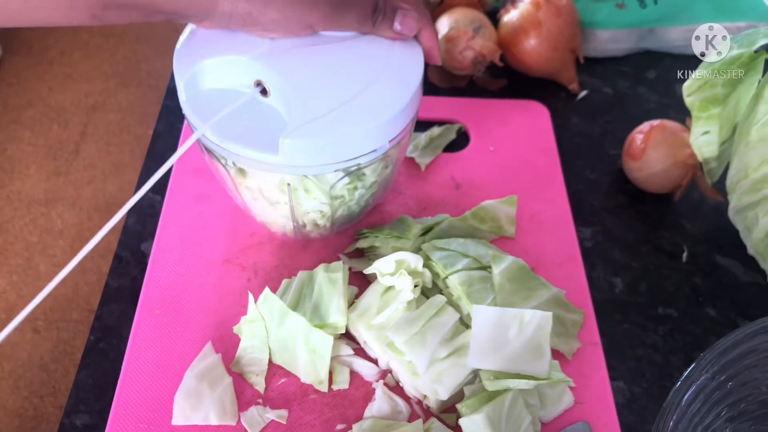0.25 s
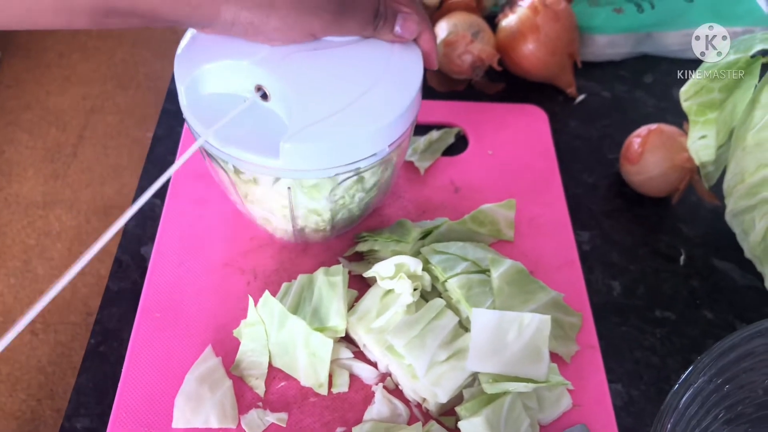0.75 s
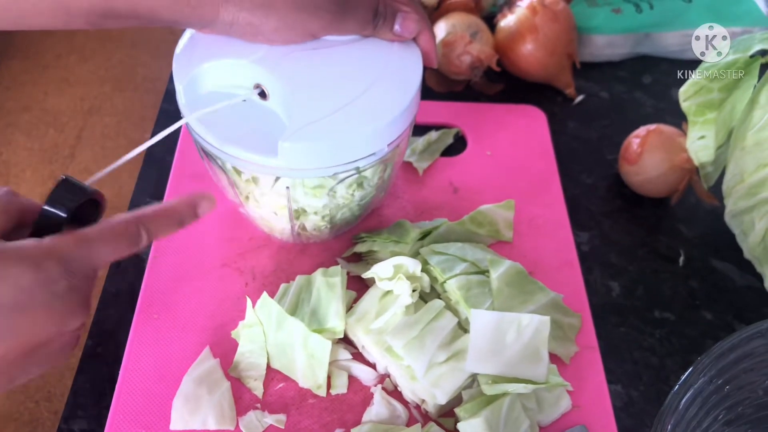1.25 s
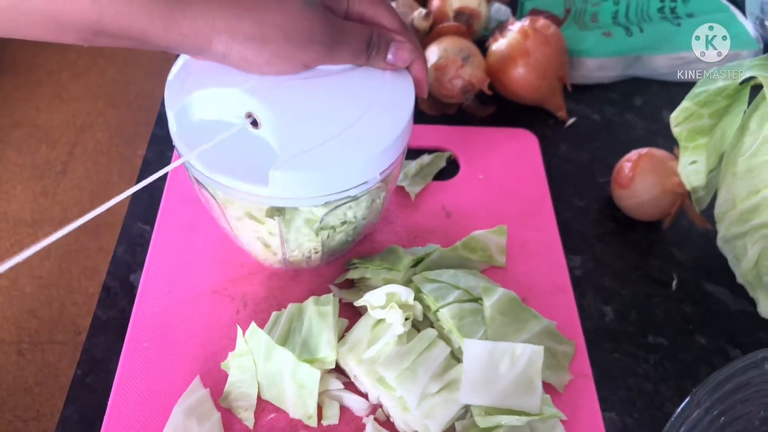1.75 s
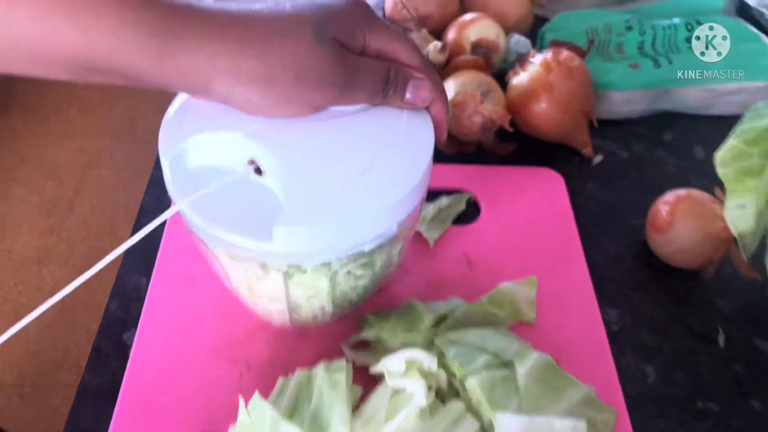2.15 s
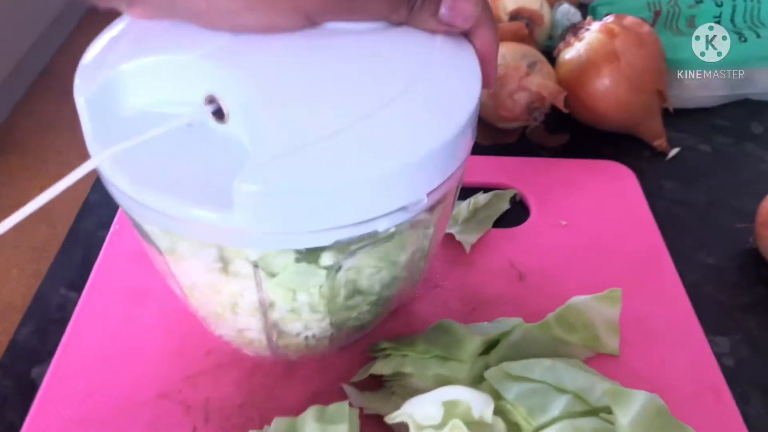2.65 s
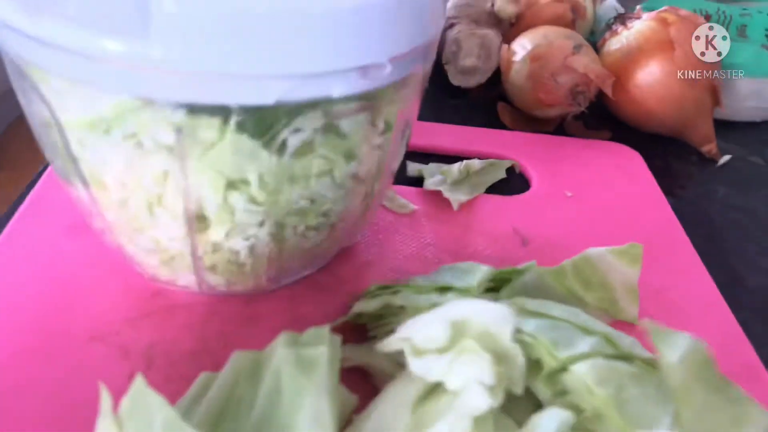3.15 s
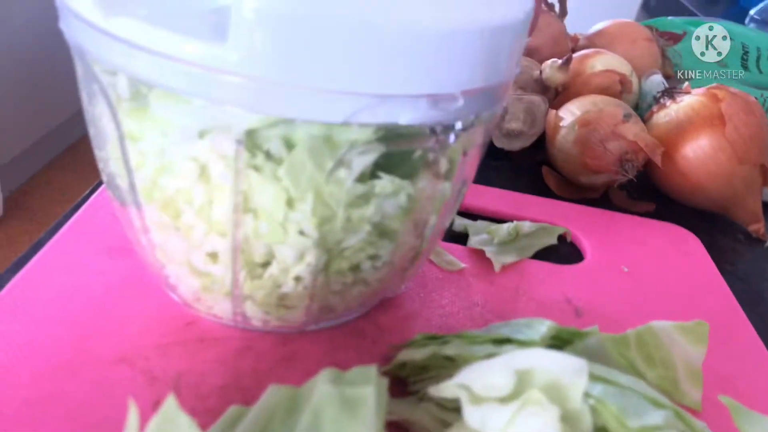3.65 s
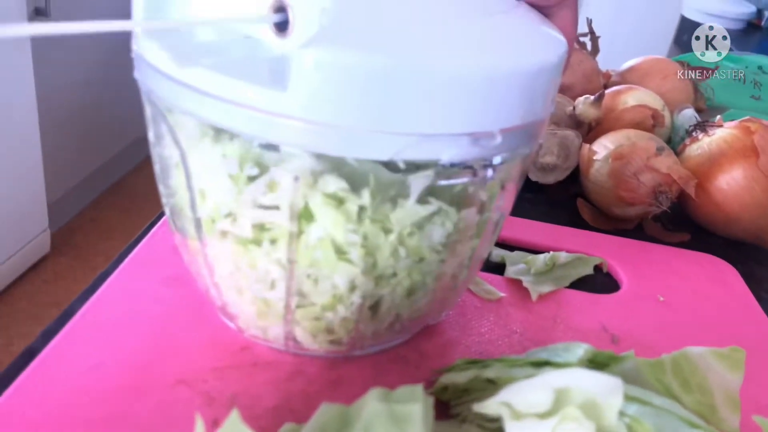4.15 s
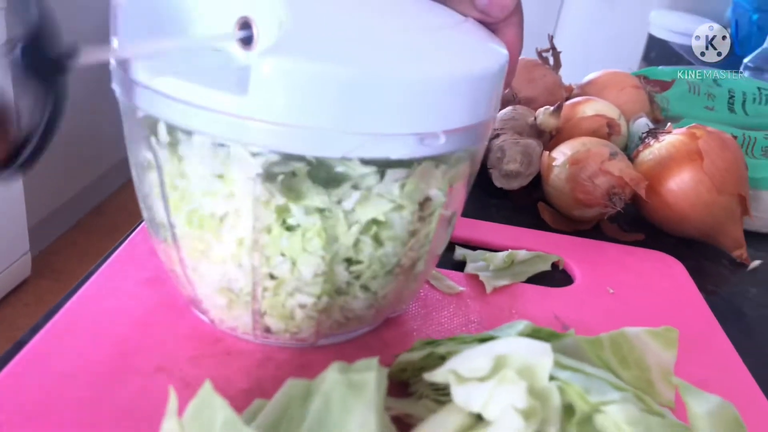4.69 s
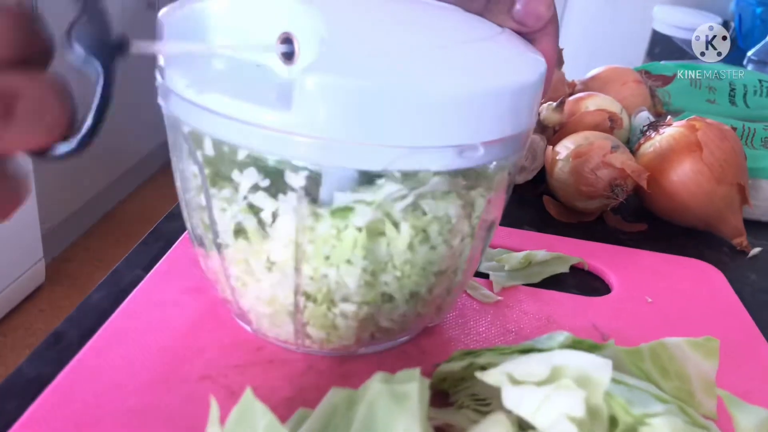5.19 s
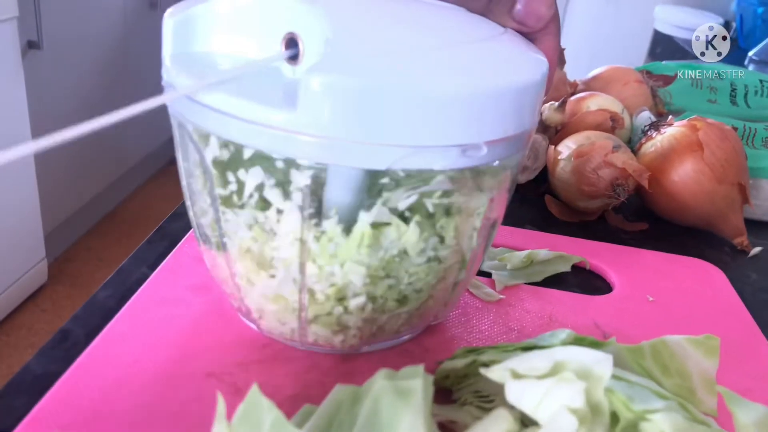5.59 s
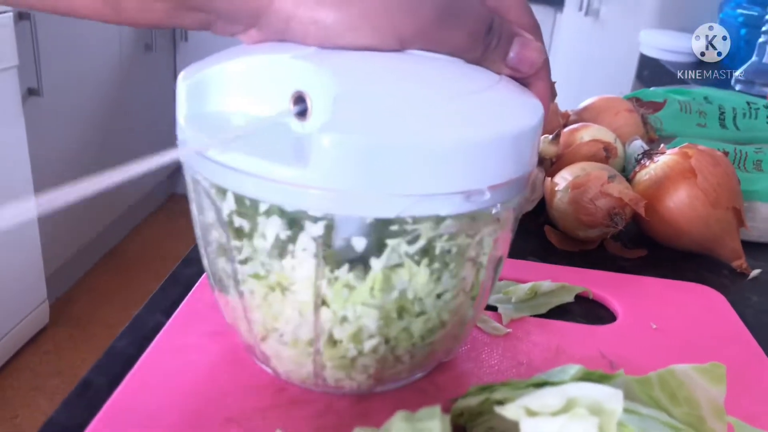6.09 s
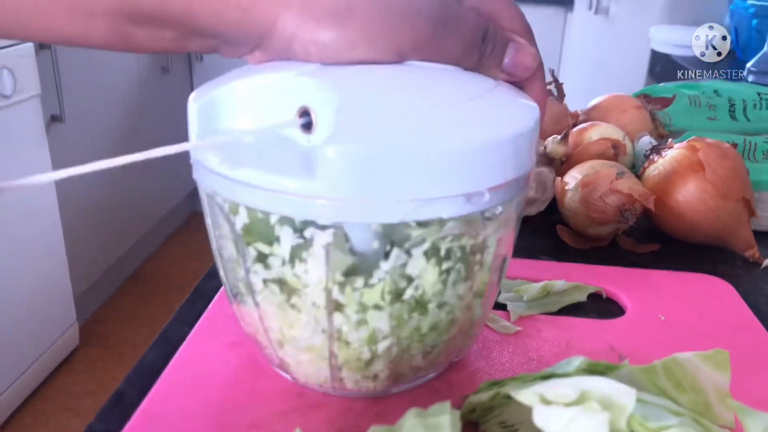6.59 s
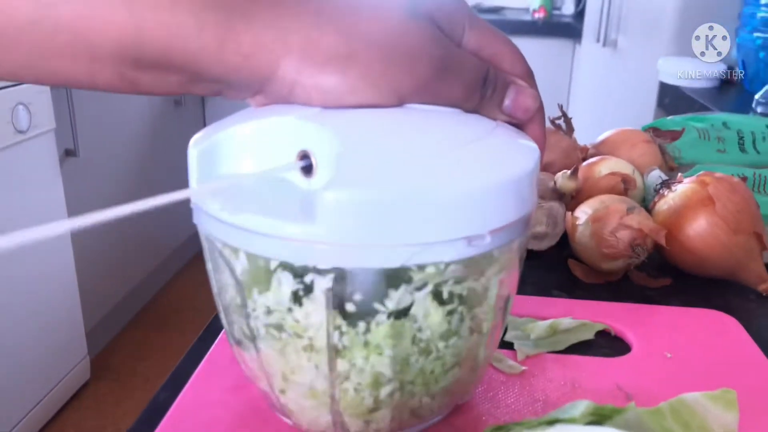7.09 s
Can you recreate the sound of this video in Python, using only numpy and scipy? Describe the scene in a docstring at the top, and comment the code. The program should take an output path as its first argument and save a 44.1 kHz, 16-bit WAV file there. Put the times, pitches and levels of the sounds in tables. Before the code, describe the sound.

Rhythmic crunching and plastic clacking from a pull-cord vegetable chopper, its spring rasping and rattling as the cord winds back each time.

```python
"""Pull-cord chopper shredding cabbage

Close up on a cutting board in a small kitchen. Each pull opens with the clack of the clutch,
then the blades batter the leaves around the plastic bowl until the cord jerks against its stop.
Between pulls the spiral spring rasps as it winds the cord back and the freewheel rattles.
Flung chunks knock on the housing, and the chop thuds more as the cabbage packs together."""
import sys
import numpy as np
from scipy import signal
from scipy.fft import rfft, irfft, next_fast_len
from scipy.io import wavfile
from scipy.ndimage import uniform_filter1d

SR = 44100
rng = np.random.default_rng(int(sys.argv[2]) if len(sys.argv) > 2 else 0)


def file_out(sig):
    """Save sig as 16-bit WAV at sys.argv[1]."""
    # one column per channel
    cols = np.atleast_2d(sig).T
    # limit, then scale
    lim = np.clip(cols, -1, 1)
    pcm = np.round(lim * 32767).astype(np.int16)
    wavfile.write(sys.argv[1], SR, pcm)


N = 323253

# Cue lists; levels are relative within each layer.
# the cord running home: start_s, wind_up_s, rasp_db
REWINDS = [(-0.16, 0.085, -12.5), (0.41, 0.088, -16), (0.937, 0.02, -21), (1.687, 0.13, -21.5),
           (2.272, 0.072, -16.5), (2.861, 0.069, -14), (3.484, 0.085, -12.5), (3.989, 0.11, -11.5),
           (4.519, 0.086, -12), (5.019, .083, -11.5), (5.522, 0.075, -12), (6.008, 0.074, -12),
           (6.45, 0.091, -12.5), (6.918, .095, -12.5)]
# pulls of the cord: start_s, fully_out_s, chop_db, clack_db, tick_db
PULLS = [(0.111, 0.333, -11, -16.5, -17.5), (0.683, 0.887, -12, -14.5, -14.5),
         (1.333, 1.606, -20, -17.5, -33), (1.959, 2.184, -11.5, -19, -19), (2.544, 2.757, -12, -13, -13),
         (3.152, 3.417, -12, -18.5, -14), (3.72, 3.92, -8, -11.5, -14), (4.245, 4.442, -9, -15, -15),
         (4.768, 4.962, -7.5, -12.5, -11), (5.263, 5.437, -10, -11, -13.5), (5.739, 5.94, -11, -9.5, -12.5),
         (6.219, 6.399, -10, -7, -13), (6.651, 6.844, -16, -22.5, -31), (7.104, 7.293, -11, -15.5, -19.5)]
# distinct knocks and ticks on the housing, mostly loud, plus faint ticks as the spring stops:
# time_s, knock_db, tick_db
KNOCKS_AND_TICKS = [(0.53, -4, -15), (0.557, -7.5, -21), (1.159, -36, -27), (1.21, -31, -25),
                    (1.686, -14, -33), (2.016, -22, -32), (2.036, -4, -24), (2.102, -4, -13),
                    (2.646, -1, -15), (2.981, -5.5, -23), (3.369, 2.5, -12), (3.595, -0.5, -15),
                    (3.766, -6, -18), (3.852, 0, -15), (4.52, -18, -8), (4.628, -10, -16), (6.252, -7, -26),
                    (6.329, -3, -22), (6.809, -4, -13), (7.194, 1.5, -11)]
# finer cabbage packs together and thuds more: time_s, packing_db
PACKING = [(0, -4), (2.2, -3.5), (3.8, -1), (7.3, 0.5)]
# lesser, chance knocks: rate_hz, knock_db, tick_db
FLUNG_CHUNKS = (14, -2, -21)
CORD_SLAPS = (10, -9, -6)

# EQ curves, shape only: frequency_hz, level_db
ROOM_TONE_EQ = [(25, -24), (130, -5), (300, -2.5), (700, -8.5), (2500, -22.5), (6000, -20), (16000, -41)]  # low background wash
SCRAPE_EQ = [(1500, -25), (3800, -22), (4550, -2.5), (5200, -21), (6300, -6.5), (7000, -8.5), (8400, 3.5),
             (10200, -6.5), (12000, -5), (13000, -11), (15800, -21)]  # coil rubbing on coil
FREEWHEEL_EQ = [(30, -37), (85, -4.5), (260, 1.5), (430, -2), (750, 0), (1150, -2.5), (1800, -0.5),
                (2250, -14.5), (2900, -3), (3700, -20), (8000, -7), (16000, -48)]  # bumping pawls
TICK_EQ = [(1500, -27), (4500, -5), (6500, -10), (8200, 5), (10000, 1.5), (12500, -8), (16000, -24)]  # bright edge of a plastic hit
CLACK_EQ = [(30, -40), (250, -11), (750, 1.5), (1200, 1.5), (1750, -2.5), (2500, -8), (4000, -11.5),
            (5200, -13), (7000, -14.5), (16000, -55)]  # body of the housing
CRUNCH_EQ = [(40, -59.5), (250, -17), (600, -7.5), (1000, 9), (1850, 3), (2200, -3.5), (3200, -4.5),
             (4200, -14.5), (5600, -11), (7300, -16), (9500, -14), (16000, -36)]  # leaves being cut
THUD_EQ = [(25, -62), (50, -24), (85, -12), (200, -8.5), (400, -5.5), (520, -2.5), (740, 8.5), (950, -7),
           (1500, -14), (4000, -67.5)]  # blows on packed cabbage
SWISH_EQ = [(300, -46), (2000, -13), (6000, -14), (9700, 1), (12500, 0), (16000, -18)]  # sliding wet shreds

# Resonances of the chopper's parts: pitch_hz, width_hz, relative_db
SPRING_MODES = [(4300, 85, -26), (6400, 150, -11), (7580, 120, -1.5), (8370, 170, -1.5), (9610, 140, 3),
                (10600, 140, -5.5), (11600, 180, -5.5)]
LID_MODES = [(1534, 330, 5.5), (1796, 100, 4.5), (2343, 180, -11), (3120, 57, -6), (4480, 240, -13.5)]
BOWL_MODES = [(270.6, 15.7, -7), (531, 20, -13), (789.6, 17, 2), (3023, 77, -19)]

# the kitchen's reverb time: frequency_hz, t60_s
KITCHEN_DECAY = [(100, 0.73), (800, 0.39), (3000, 0.33), (12000, 0.047)]


def amp(db):
    """Decibels to gain."""
    return 10 ** (np.asarray(db) / 20)


def along(points, hz):
    """Read a curve of (hz, value) points on a log frequency axis."""
    frequencies, values = np.transpose(points)
    return np.interp(np.log(hz + 1), np.log(frequencies), values)


def clock():
    """The time of every sample in seconds."""
    return np.arange(N) / SR


def colour(x, eq):
    """Shape x with an EQ curve, as a causal filter of unit energy."""
    size = 4096
    cepstrum = irfft(np.log(amp(along(eq, np.fft.rfftfreq(size, 1 / SR)))))
    cepstrum[1:size // 2] *= 2  # minimum phase keeps attacks sharp
    cepstrum[size // 2 + 1:] = 0
    response = irfft(np.exp(rfft(cepstrum)))
    return signal.fftconvolve(x, response / np.linalg.norm(response))[:N]


def ring(x, modes):
    """Pass x through damped resonances of unit total energy."""
    t = np.arange(SR // 4) / SR
    response = sum(amp(db) * width * np.exp(-np.pi * width * t) * np.cos(2 * np.pi * hz * t)
                   for hz, width, db in modes)
    return signal.fftconvolve(x, response / np.linalg.norm(response))[:N]


def contacts(rate_hz, jitter, scatter_db, decay_s, bed):
    """Rough contacts: noise grains of uneven size and spacing over a bed of rubbing."""
    count = np.cumsum(rate_hz * np.ones(N)) / SR
    timing, size = rng.standard_normal((8000, 2))[:int(count[-1])].T
    onsets = np.searchsorted(count, np.arange(len(timing)) + jitter * timing).clip(0, N - 1)
    blows = np.bincount(onsets, amp(scatter_db * size.clip(-2, 2)) ** 2, N)
    power = np.abs(signal.lfilter([1], [1, -np.exp(-2 / (decay_s * SR))], blows))
    power += bed * power.mean()
    # the drive supplies a steady force, shared among the contacts of the moment
    power /= np.abs(uniform_filter1d(power, size=2600)) + 1e-12
    return np.sqrt(power) * rng.standard_normal(N)


def burst(start_s, decay_s):
    """A noise transient with a fast attack and a short tail."""
    t = np.arange(SR // 20) / SR
    attack = 1 - np.exp(-t / 0.0004)
    noise = rng.standard_normal(len(t)) * attack * np.exp(-t / decay_s)
    return np.pad(noise, (max(round(start_s * SR), 0), N))[:N]


def hits(cues, lid_db, knock_decay_s, tick_decay_s, lag_s, knock_db=0, tick_db=0):
    """Hard plastic hits: a bright tick, then the knock of the housing, which rings bowl and lid."""
    ticks = sum(amp(tick + tick_db) * burst(s, tick_decay_s) for s, _, tick in cues)
    blows = sum(amp(knock + knock_db) * burst(s + lag_s, knock_decay_s) for s, knock, _ in cues)
    ringing = amp(-16) * ring(blows, BOWL_MODES) + amp(lid_db) * ring(blows, LID_MODES)
    return colour(ticks, TICK_EQ) + colour(blows, CLACK_EQ) + ringing


def packing():
    """Gain that grows as the cabbage turns from loose leaves into a dense mass."""
    return amp(np.interp(clock(), *np.transpose(PACKING)))


def room_tone():
    """A steady, dark bed of noise."""
    return colour(rng.standard_normal(N), ROOM_TONE_EQ)


def rewind_speed(rise_db, fall_db, full_rewind_s):
    """The spring takes up the cord quickly, then slows until it is home or the next pull begins."""
    t, speed = clock(), np.zeros(N)
    for (start, wind_up, db), (next_pull, *_) in zip(REWINDS, PULLS):
        peak, end = start + wind_up, min(next_pull, start + full_rewind_s)
        speeding = np.interp(t, [start, peak], [1, 0])
        slowing = np.interp(t, [peak, end], [0, 1])
        running = np.interp(t, [start - .004, start, end, end + 0.018], [0, 1, 1, 0])
        speed += amp(db - rise_db * speeding ** 2 - fall_db * slowing ** 1.8) * running
    return speed


def spring_rasp(speed):
    """The spring's coils scrape over each other in tiny slips and ring."""
    slips = speed * contacts(40 + 560 * speed ** 0.66, jitter=.45, scatter_db=3, decay_s=.0017, bed=.094)
    scrape = speed * contacts(210, jitter=.5, scatter_db=3.5, decay_s=.0013, bed=.7)
    return amp(-4) * ring(slips, SPRING_MODES) + amp(-2) * colour(scrape, SCRAPE_EQ)


def freewheel(speed):
    """The pawls bump over the freewheel, rattling lid and bowl."""
    pawls = contacts(25 + 35 * speed ** .5, jitter=.16, scatter_db=4.5, decay_s=.0062, bed=1)
    bumps = speed ** 0.73 * pawls
    rattle = amp(-20) * ring(bumps / packing(), LID_MODES)
    body = amp(-9.5) * colour(bumps * packing() ** 0.81, FREEWHEEL_EQ)
    return rattle + body + amp(-27.5) * ring(bumps, BOWL_MODES)


def clutch():
    """The clutch catches with a clack at the start of every pull."""
    catches = [(start, clack, tick) for start, _, _, clack, tick in PULLS]
    return hits(catches, lid_db=-5, knock_decay_s=.0047, tick_decay_s=.0034, lag_s=.00069,
                knock_db=3, tick_db=6)


def pull_force(rise_db, ease_db, peak_share, coast_s):
    """The arm speeds up, eases a little and lets go; the cabbage then brakes the blades."""
    t, force = clock(), np.zeros(N)
    for start, release, db, *_ in PULLS:
        progress = (t - start) / (release - start)
        speeding = np.interp(progress, [0, peak_share], [1, 0])
        easing = np.interp(progress, [peak_share, 1], [0, 1])
        engaged = (t > start) * np.exp(-np.maximum(t - release, 0) / coast_s)
        force += amp(db - rise_db * speeding ** 2.2 - ease_db * easing ** 2) * engaged
    return force


def blades(force):
    """Blades strike leaves several dozen times a second; a harder pull is faster and crisper."""
    effort = force / force.max()
    chops = force * contacts(40 + 42 * effort ** .5, jitter=.16, scatter_db=1.5, decay_s=.0033, bed=.36)
    shreds = force * contacts(400, jitter=.6, scatter_db=4.5, decay_s=.00094, bed=.11)
    mash = packing()
    crunch = colour((amp(-3) * chops + amp(-5) * shreds) * (effort + 0.04) ** 0.21, CRUNCH_EQ)
    thud = colour(mash * (amp(-2.5) * chops + amp(-5.5) * shreds), THUD_EQ)
    snap = amp(-21.5) * ring(chops / mash ** 2, LID_MODES)  # large, stiff leaves rattle the lid
    swish = amp(-23.5) * colour(force * rng.standard_normal(N), SWISH_EQ)
    wall = amp(-10.5) * ring(chops * mash ** .5, BOWL_MODES)
    # the bowl's main note sings until the mash damps it
    hollow = amp(-16.5) * ring(chops / mash ** 2.3, [(798, 16, 0)])
    return crunch + thud + snap + swish + wall + hollow


def stray_cues(motion, rate_hz, knock_db, tick_db):
    """Chance knocks whose strength follows a moving part: time_s, knock_db, tick_db."""
    scatter_db, gate_db = 1.5, -40
    chance = rng.standard_normal((300, 3))
    times = (np.arange(len(chance)) + .3 * chance[:, 0]) / rate_hz
    motion_db = 20 * np.log10(np.interp(times, clock(), motion, left=0, right=0) + 1e-9)
    levels = motion_db[:, None] + [knock_db, tick_db] + scatter_db * chance[:, 1:].clip(-2, 2)
    return np.column_stack([times, levels])[motion_db > gate_db]


def knocks(force, speed):
    """Chunks hit the bowl on the pull, the cord slaps the lid going home; plus cued knocks and ticks."""
    strays = np.vstack([stray_cues(force, *FLUNG_CHUNKS), stray_cues(speed, *CORD_SLAPS)])
    lesser = hits(strays, lid_db=-17, knock_decay_s=.0025, tick_decay_s=.0018, lag_s=.00015,
                  knock_db=2.5, tick_db=-4)
    cued = hits(KNOCKS_AND_TICKS, lid_db=-10, knock_decay_s=.0035, tick_decay_s=.0016, lag_s=.00024,
                knock_db=-3, tick_db=2)
    return lesser + cued


def turnarounds():
    """The cord hits its end stop as hard as it was pulled; a click follows as the spring takes over."""
    stops = [(release, db + 3, db + 2.5) for _, release, db, *_ in PULLS]
    take_ups = [(start, db - 15, db - 10) for start, _, db in REWINDS]
    return hits(stops + take_ups, lid_db=-16, knock_decay_s=.0033, tick_decay_s=.0015, lag_s=.00021)


def hum(start_s, end_s, pitch_hz, level_db):
    """A short, soft low hum."""
    t = clock()
    fade = np.interp(t, [start_s, start_s + .016, end_s - .03, end_s], [0, 1, 1, 0])
    return amp(level_db) * fade * np.sin(2 * np.pi * pitch_hz * t)


def kitchen_reverb(x):
    """Diffuse reflections off worktop and cupboards; the treble dies first."""
    hz, t, noise = signal.stft(rng.standard_normal(SR // 2), SR, nperseg=256)
    decay = amp(-60 * t / along(KITCHEN_DECAY, hz)[:, None])
    tail = signal.istft(noise * decay, SR, nperseg=256)[1]
    predelay = round(0.0033 * SR)
    response = np.pad(tail / np.linalg.norm(tail), (predelay, 0))
    return signal.fftconvolve(x, response)[:N]


def scene():
    """The mono mix: chopper and a brief hum in the kitchen, over faint room tone."""
    speed = rewind_speed(rise_db=12.5, fall_db=30, full_rewind_s=.31)
    force = pull_force(rise_db=17, ease_db=4.5, peak_share=.78, coast_s=.03)
    direct = blades(force) + spring_rasp(speed) + freewheel(speed)
    direct += clutch() + turnarounds() + knocks(force, speed)
    direct += hum(start_s=1.04, end_s=1.11, pitch_hz=207, level_db=-32)
    background = amp(-43) * room_tone()
    return (direct + amp(-17.5) * kitchen_reverb(direct) + background)[None]


def record(dry):
    """The phone rounds off the loudest peaks and keeps nothing above its band limit."""
    clipped = dry / (1 + np.abs(dry) ** 8) ** (1 / 8)
    size, top_hz = next_fast_len(N + SR // 4), 15900
    passband = np.fft.rfftfreq(size, 1 / SR) < top_hz
    return irfft(rfft(clipped, size) * passband, size)[:, :N]


dry = scene()
out = record(dry)
file_out(out)
```